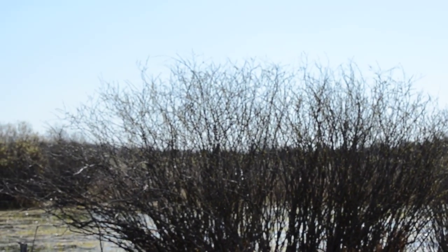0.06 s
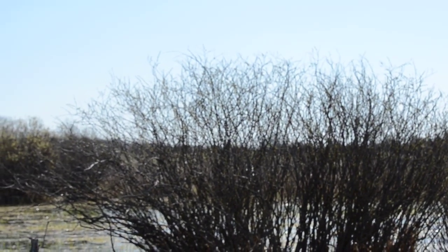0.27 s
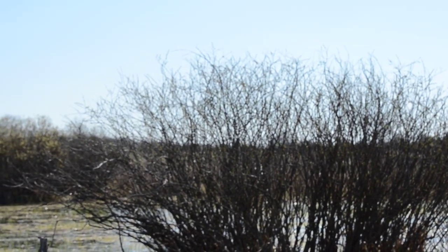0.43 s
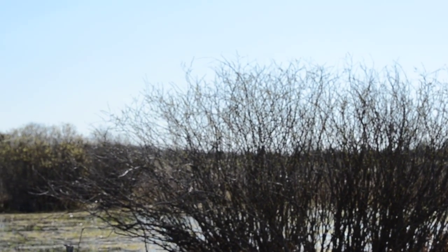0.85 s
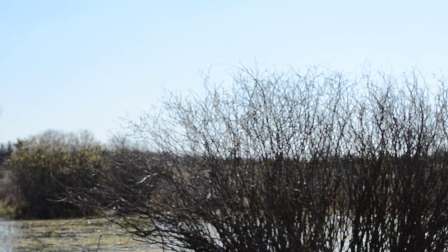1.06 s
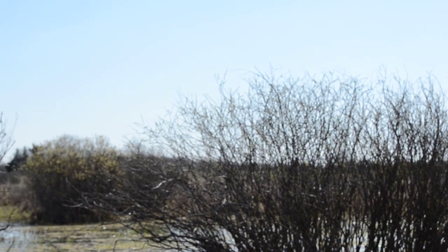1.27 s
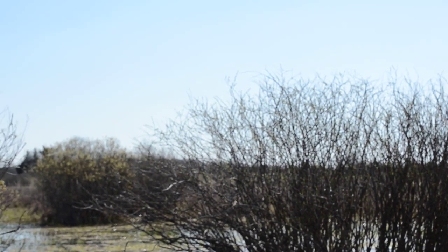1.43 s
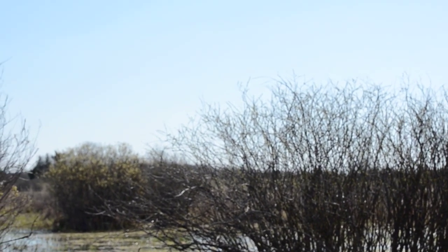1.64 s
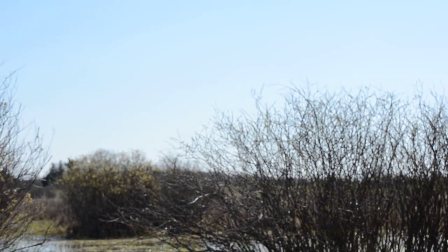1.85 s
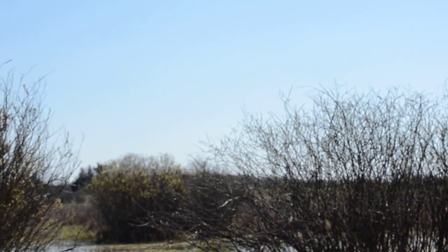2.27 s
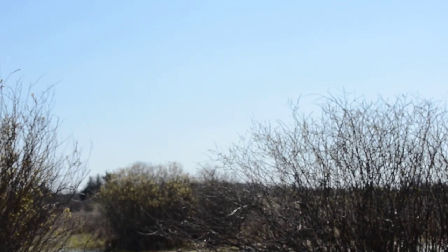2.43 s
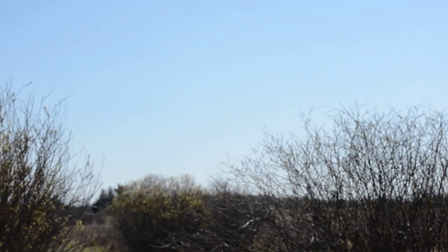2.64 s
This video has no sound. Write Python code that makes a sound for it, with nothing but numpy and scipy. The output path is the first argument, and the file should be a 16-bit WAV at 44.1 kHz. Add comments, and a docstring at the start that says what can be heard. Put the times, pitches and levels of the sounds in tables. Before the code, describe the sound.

A blackbird sings two liquid notes and a buzzy trill at the edge of a wet field. Wind bumps the microphone, a small bird reels off quick chirps, a frog rattles, and the blackbird gives two harsh calls.

```python
"""A blackbird at the edge of a wet field sings two liquid notes and a buzzy trill, then calls harshly.
The trill is a run of steep glides from the two sides of its syrinx. A small bird reels off quick sweeps,
a frog rattles in pulses, each a bright click and a lower knock, and other birds whistle far off.
Bushes and water scatter every call. Wind bumps the microphone, something ticks once close by,
and a blurred marsh chorus swells underneath."""
import sys
import numpy as np
from scipy import signal
from scipy.fft import rfft, irfft
from scipy.io import wavfile

SR = 44100
rng = np.random.default_rng(int(sys.argv[2]) if len(sys.argv) > 2 else 0)


def inscribe(sig):
    """Save sig as 16-bit PCM at rate SR to the path in sys.argv[1].

    A 1-D sig is mono; a 2-D sig holds one channel per row.
    Samples are clipped to [-1, 1] before scaling.
    """
    pcm = np.round(np.clip(np.atleast_2d(sig).T, -1, 1) * 32767)
    wavfile.write(sys.argv[1], SR, pcm.astype(np.int16))


N = 123479
TIME = np.arange(N) / SR


def blackbird_notes():
    """A clear note whose strength moves between harmonics, framed by buzzy slurs."""
    # clear note: (time [s], level of harmonic 1 [dB], of 2 [dB], of 4 [dB], of 5 [dB])
    harmonic_levels = [(0.24,-54,-36,-83,-83.5),(.275,-58,-38,-92,-80.5),(.305,-46.5,-50,-89,-89.5),(.345,-36,-66.5,-72.5,-69.5),(0.401,-38,-68,-84,-68),(.455,-59,-54.5,-51,-80.5),(.488,-55,-59,-56,-68)]
    # its pitch: (time [s], pitch [Hz])
    melody = [(.24,1245),(.33,1291),(.47,1264)]
    # one curve per slur: (time [s], pitch [Hz], level [dB])
    slurs = [
        [(.224,2390,-50),(.231,2255,-29),(.236,2480,-33.5),(.283,2545,-39.5)],
        [(.485,2520,-51.5),(.525,2230,-27),(.538,2248,-28),(.582,2496,-41)],
        [(.589,4960,-38),(.602,5720,-59)],
        [(.593,2900,-26.5),(.595,3370,-35.5),(.601,3650,-41.5),(.63,3310,-39)],
    ]
    s, *levels = np.transpose(harmonic_levels)
    pitch = curve(melody, TIME) * (1 + .0039 * wander(N, 400))
    phase = 2 * np.pi * np.cumsum(pitch) / SR
    gate = np.clip(np.minimum(TIME - s[0], s[-1] - TIME) / .0074 + 1, 0, 1)
    harmonics = sum(amp(np.interp(TIME, s, db)) * np.sin(k * phase)
                    for k, db in zip((1, 2, 4, 5), levels))
    out = gate * np.sqrt(2) * harmonics
    for slur in slurs:
        hoarseness = .035 if slur[0][1] > 2700 else .009  # high slurs are rougher
        add(out, *whistle(slur, rough=hoarseness, buzz=.044))
        start, airy_overtone = whistle(slur, rough=.07, pitch_ratio=3)
        add(out, start, amp(-37.5) * airy_overtone)
    return outdoors(out, near_db=-13, far_db=-23)


def blackbird_trill():
    """Fifty uneven syllables a second: a steep glide from each side of the syrinx, with short rings."""
    # glides and rings of a syllable: (delay [s], length [s], start pitch [Hz], end pitch [Hz], level [dB])
    syllable = [(0,0.0045,5780,2830,-38.5),(0.00031,0.014,5030,5180,-45.5),(0.0022,0.0099,4000,4060,-48),(0.0014,0.014,3460,3530,-42),(.0075,0.00592,4000,2310,-36),(0.0075,.0055,2780,2740,-34.5),(0.018,0.0036,2560,3000,-36.5),(0.00052,0.014,1800,1720,-56),(0.0022,0.023,8200,7800,-72.5)]
    start_s, period_s = .6132, .01975
    out = np.zeros(N)
    for k in range(23):
        lag = np.exp(-k / 2.7)  # the trill starts quicker and a touch softer, then settles
        s = start_s + period_s * k + .012 * lag
        for delay, length, from_hz, to_hz, db in syllable:
            detune, accent_db = rng.standard_normal(2)
            shift = 1 + .015 * detune
            rough = .029 * (3 if from_hz > 6000 else 1)  # the top overtone sizzles
            glide = chirp(length, from_hz * shift, to_hz * shift, rough)
            add(out, s + delay, amp(db - lag + accent_db) * glide)
    return outdoors(out, near_db=-4.5, far_db=-12, near_s=.0058)


def harsh_calls():
    """The blackbird's two fluttering rasps; the first collapses into a falling, reedy tone."""
    # rasp envelopes: (start [s], rise [s], hold [s], fade [dB/s], level [dB])
    rasps = [(1.983,0.0063,0.018,756,-36),(2.431,0.038,0.053,190,-43)]
    # one spectrum per rasp: (frequency [Hz], relative level [dB])
    colours = [
        [(450,-34),(1100,-8),(2000,-9.5),(4600,-6.5),(7500,-3),(8600,-21),(12500,-50)],
        [(450,-11.5),(1000,4.5),(2700,8),(3700,0.5),(7600,-9.5),(10000,-26.5),(15000,-48)],
    ]
    # falling tone: (time [s], pitch [Hz], level [dB])
    falling_tone = [(1.987,4730,-41),(2.004,4600,-36),(2.018,3066,-35.5),(2.029,3033,-33),(2.045,2920,-50)]
    # reedy edge late in that tone: (harmonic number, level [dB])
    reed = [(1,-50.5),(2,-52),(4,-50),(7,-52),(8,-49),(9,-62)]
    out, t = np.zeros(N), np.arange(SR // 2) / SR
    for (s, rise, hold, fade, db), colour in zip(rasps, colours):
        flutter = 1 + .65 * tone(hz=np.full(len(t), 340.), rough=.08)
        envelope = np.minimum(t / rise, 1) * amp(db - fade * np.maximum(t - rise - hold, 0))
        add(out, s, envelope * unit(flutter * noise(colour, size=len(t))))
    sizzle = unit(wander(N, 1200)) * tone(hz=np.full(N, 7600), rough=.05)
    out += amp(-48.5) * swell(peak_s=2.481, half_width_s=.054) * sizzle  # tops the second rasp
    add(out, *whistle(falling_tone, rough=.023, buzz=.031))
    for k, db in reed:
        add(out, 2.012, amp(db) * chirp(.024, from_hz=k * 1100, to_hz=k * 957, rough=.0049))
    return outdoors(out, near_db=-4, far_db=-9)


def reeling_bird():
    """About ten phrases a second, slowly relaxing: a long downsweep, a clipped one and an upsweep."""
    # falling sweep: (time from its peak [s], pitch [Hz], level [dB])
    downsweep = [(-.005,9110,-74.5),(-.002,7370,-52.5),(0,6473,-43),(.002,5520,-44.5),(.011,3770,-50.5)]
    # rising sweep: (time from its peak [s], pitch [Hz], level [dB])
    upsweep = [(-.009,3634,-56.5),(-.002,3998,-41),(.007,4900,-49),(.014,6880,-57.5)]
    # fade over the song: (time [s], gain [dB])
    fade = [(.76,-1),(2.55,-3.5),(2.75,-14)]
    start_s, period_s, drag_s = .765, .0908, .00035
    out, k = np.zeros(N), np.arange(21)
    phrases = start_s + period_s * k + drag_s * k ** 2
    for s in phrases:
        late = .0047 * s  # the sweeps spread apart as the song slows
        for delay, shape in ((0, downsweep), (.0375 + late, downsweep[:-1]), (.058 + late, upsweep)):
            if s + delay > phrases[-1]:  # the song stops on a downsweep
                break
            lead, sweep = whistle(shape, rough=.0049, pitch_ratio=1 + .0081 * rng.standard_normal())
            add(out, s + delay + lead, amp(curve(fade, s)) * sweep)
    return outdoors(out, near_db=-16.5, far_db=-9)


def frog():
    """A rattle of like pulses, each a bright click and then a lower knock."""
    # pulse onsets: (time [s])
    pulses = [1.5045,1.639,1.695,1.7335,1.773,1.8138,1.8534,1.892,1.932,1.970,2.010,2.0485,2.0878,2.1286,2.1673,2.2073,2.247,2.2887,2.3297,2.3715,2.413,2.4553,2.4983,2.5394,2.5804,2.6267]
    # swell of the rattle: (time [s], gain [dB])
    dynamics = [(1.5,-8),(1.97,-4),(2.1,-1),(2.5,-1.5),(2.54,-8)]
    # fixed ringing tones of each pulse: (frequency [Hz], level [dB], delay [s], rise [s])
    rings = [(919,-35,0.0017,.0014),(717,-40,0.0039,0.0011),(1267,-43,0.003,.0026),(1250,-35.5,0,0.00056),(1694,-41,0.0056,.0007),(2134,-46,0.0013,0.0028),(2820,-38,0.001,0.00072)]
    out, t = np.zeros(N), np.arange(SR // 30) / SR
    for s in pulses:
        for hz, db, delay, rise in rings:
            add(out, s + delay, amp(db + curve(dynamics, s)) * knock(t, hz, rise))
    low_cut = signal.butter(6, 567, "highpass", fs=SR, output="sos")
    return outdoors(signal.sosfilt(low_cut, out), near_db=-12, far_db=-11)


def snap():
    """One sharp tick close by: a burst of noise that dies in a few milliseconds."""
    # tick's EQ: (frequency [Hz], gain [dB])
    colour = [(150,-11),(2000,-8.5),(3400,4.5),(7600,-5.5),(14000,-34.5)]
    start_s, decay_s = 1.8134, .0011
    envelope = (TIME > start_s) * np.exp(-abs(TIME - start_s) / decay_s)
    burst = envelope * rng.choice([-1., 1.], N)
    return outdoors(amp(-15) * tint(burst, colour), near_db=-18, far_db=-39, near_s=.0015)


def wind():
    """Air buffets the microphone in short lumps, with one hard bump."""
    # buffets: (peak time [s], half width [s], level [dB])
    puffs = [(.65,0.02,-50),(0.687,0.011,-45),(0.763,0.025,-37.5),(0.822,0.016,-34.5),(0.906,0.015,-44.5),(0.951,0.012,-38),(0.97,0.025,-48)]
    # their rumble: (frequency [Hz], relative level [dB])
    rumble = [(25,-13),(70,0.5),(130,2),(550,-20.5),(900,-33),(3000,-87)]
    out = sum(amp(db) * swell(s, half_width) for s, half_width, db in puffs) * noise(rumble)
    t = np.arange(SR // 10) / SR
    add(out, .7428, amp(-16.5) * knock(t, hz=154, rise_s=.0023))
    return out


def far_birds():
    """Thin, fluttering whistles, and falling peeps each led by a faint lower slur."""
    # one curve per whistle: (time [s], pitch [Hz], level [dB])
    whistles = [
        [(0,1370,-44.5),(.085,1135,-62.5)],
        [(.12,1127,-51.5),(.133,1106,-46.5),(.138,1250,-57)],
        [(.191,1410,-48.5),(.198,1300,-51)],
        [(.602,1310,-47.5),(.62,1470,-56)],
        [(.65,1273,-47),(.69,1324,-52),(.755,1341,-45.5),(.835,1325,-62.5)],
        [(1.635,1305,-44.5),(1.79,1347,-44),(1.84,1316,-51)],
        [(2.54,1290,-52),(2.63,1330,-53.5)],
    ]
    # peeps: (centre time [s], level [dB])
    peeps = [(0.018,-51.5),(.957,-46.5),(1.164,-49),(1.375,-48),(1.589,-45),(1.803,-47),(2.034,-46.5),(2.285,-45.5)]
    peep_s, centre_hz, spread = .0321, 2556, np.exp(.289)
    out = np.zeros(N)
    for note in whistles:
        add(out, *whistle(note, rough=.016))
    for s, db in peeps:
        peep = chirp(peep_s, centre_hz * spread, centre_hz / spread, rough=.034)
        add(out, s - peep_s / 2, amp(db) * peep)
        add(out, s - .026, amp(db - 7) * chirp(.0434, from_hz=1780, to_hz=1278, rough=.11))
    flutter = 1 + .17 * wander(N, 300)
    return outdoors(out * flutter, near_db=-14, far_db=-13)


def field():
    """A bed of still air and the blurred chorus of the far marsh."""
    # still air: (frequency [Hz], relative level [dB])
    air_colour = [(25,-9.5),(60,-3),(400,-9),(1300,-2.5),(1900,-12.5),(4300,-14),(15500,-40)]
    # swell of the chorus: (time [s], level [dB])
    chorus_level = [(0,-85),(.55,-67),(.9,-61.5),(2.4,-55.5),(2.8,-70)]
    # its spectrum: (frequency [Hz], relative level [dB])
    chorus_colour = [(400,-10.5),(900,-10.5),(3300,-14.5),(4300,3),(7600,-16),(9500,-34),(14000,-58)]
    air = amp(-61) * noise(air_colour)
    chorus_db = curve(chorus_level, TIME) + .77 * wander(N, 39.8)
    return air + amp(chorus_db) * noise(chorus_colour)


def outdoors(x, near_db, far_db, near_s=.0088):
    """Adds quick reflections off twigs and water and a thin, longer tail."""
    t, t60_s = np.arange(SR // 2) / SR, .31
    near = rng.standard_normal(len(t)) * np.exp(-t / near_s) * (t > .001)
    far = rng.standard_normal(len(t)) * (t > near_s) * amp(-60 * t / t60_s)
    response = amp(near_db) * near / np.linalg.norm(near) + amp(far_db) * far / np.linalg.norm(far)
    return x + signal.fftconvolve(x, response)[:N]


def whistle(points, rough, buzz=0., pitch_ratio=1):
    """Start time and sound of a note from (s, Hz, dB) points; a 290 Hz vibrato gives the buzz."""
    s, hz, db = np.transpose(points)
    t = np.arange(s[0], max(s[-1], s[0] + .002), 1 / SR)
    gate = np.clip(np.minimum(t - t[0], t[-1] - t) / .0006, 0, 1)
    pitch = pitch_ratio * np.interp(t, s, hz) * (1 + buzz * np.sin(2 * np.pi * 290 * t))
    return s[0], gate * amp(np.interp(t, s, db)) * tone(pitch, rough)


def chirp(length_s, from_hz, to_hz, rough):
    """A short glide under an arched envelope."""
    progress = np.arange(0, length_s, 1 / SR) / length_s
    return np.sin(np.pi * progress) * tone(from_hz * (to_hz / from_hz) ** progress, rough)


def tone(hz, rough):
    """A sine on a pitch curve, roughened by pitch jitter."""
    pitch = hz * (1 + rough * wander(len(hz), 1200))
    return np.sqrt(2) * np.sin(2 * np.pi * (rng.random() + np.cumsum(pitch) / SR))


def knock(t, hz, rise_s):
    """A damped ringing tone whose envelope peaks at rise_s."""
    return t / rise_s * np.exp(1 - t / rise_s) * np.sin(2 * np.pi * hz * t)


def swell(peak_s, half_width_s):
    """A bell-shaped envelope."""
    return np.exp(-((TIME - peak_s) / half_width_s) ** 2)


def noise(colour, size=N):
    """Noise of a given spectrum, rms 1."""
    return unit(tint(rng.standard_normal(size), colour))


def tint(x, colour):
    """EQ through (Hz, dB) points on a log-frequency axis."""
    hz, db = np.transpose(colour)
    bins_hz = np.fft.rfftfreq(len(x), 1 / SR)
    gain_db = np.interp(np.log(bins_hz + 1), np.log(hz + 1), db)
    return irfft(rfft(x) * amp(gain_db), len(x))


def wander(size, rate_hz):
    """Smooth random motion."""
    at = np.arange(size) * rate_hz / SR
    return np.interp(at, np.arange(size), rng.standard_normal(size))


def curve(points, s):
    """Reads (time, value) points at s seconds."""
    return np.interp(s, *np.transpose(points))


def add(mix, s, sound):
    """Mixes a sound in at s seconds."""
    part = mix[max(round(s * SR), 0):][:len(sound)]
    part += sound[:len(part)]


def amp(db):
    """Decibels to gain."""
    return 10 ** (np.asarray(db) / 20)


def unit(x):
    """Scales to rms 1."""
    return x / np.sqrt(np.mean(x ** 2) + 1e-20)


def scene():
    """All sources at one microphone."""
    calls = blackbird_notes() + blackbird_trill() + reeling_bird() + frog() + far_birds() + harsh_calls()
    return (calls + snap() + wind() + field())[None]


def record(dry):
    """Two narrow dips in the microphone's treble, then a steep high cut."""
    hz = np.fft.rfftfreq(N, 1 / SR)
    dips_db = -11 * np.exp(-((hz - 5700) / 160) ** 2) - 8 * np.exp(-((hz - 6900) / 130) ** 2)
    coloured = irfft(rfft(dry) * amp(dips_db), N)
    high_cut = signal.firwin(511, 15750, window=("kaiser", 9), fs=SR)
    return signal.oaconvolve(coloured, high_cut[None], "same")


dry = scene()
out = record(dry)
inscribe(out)
```